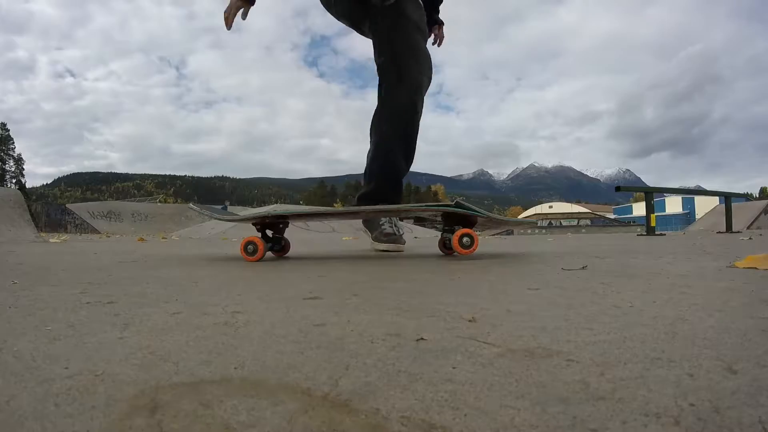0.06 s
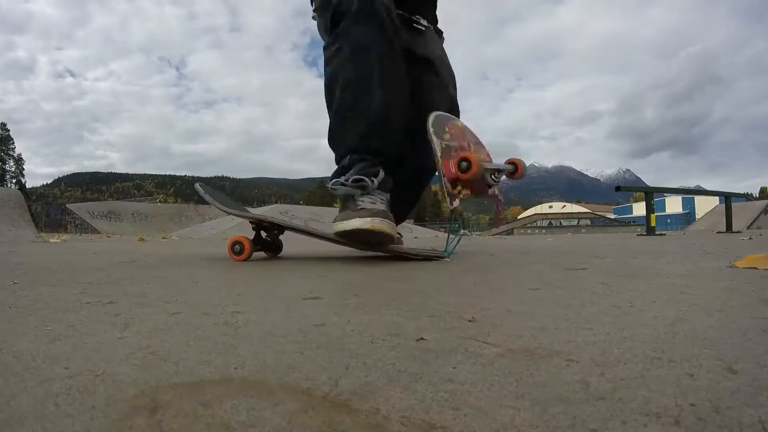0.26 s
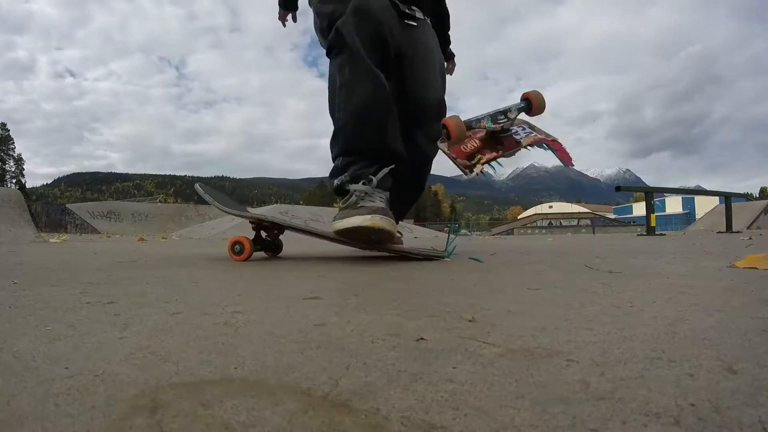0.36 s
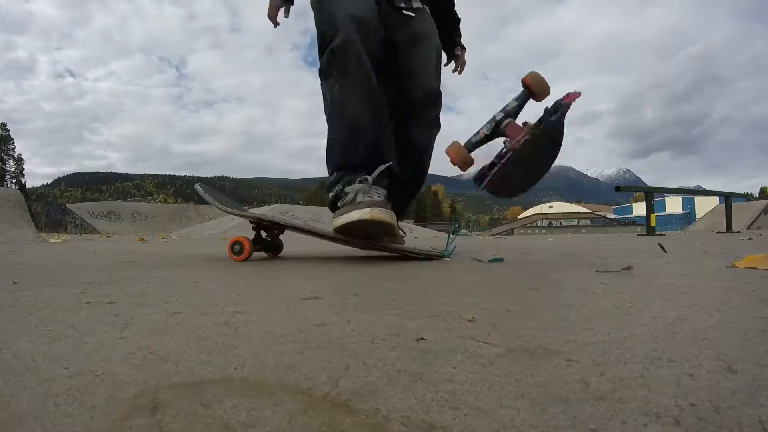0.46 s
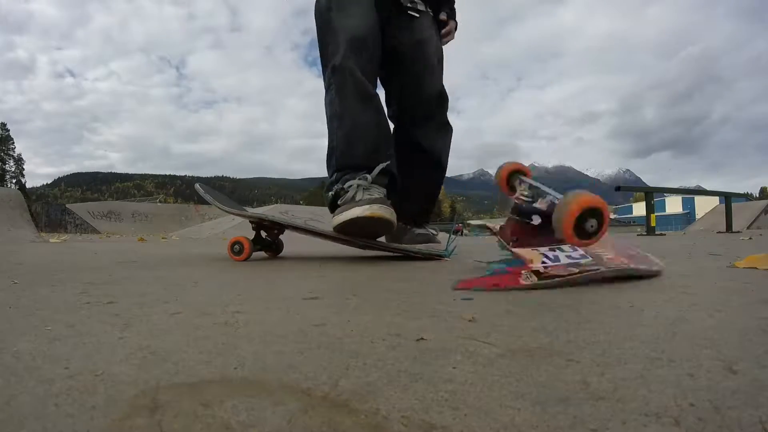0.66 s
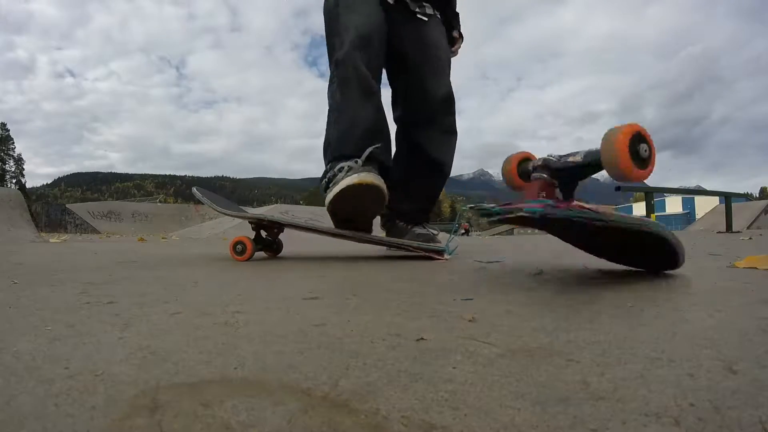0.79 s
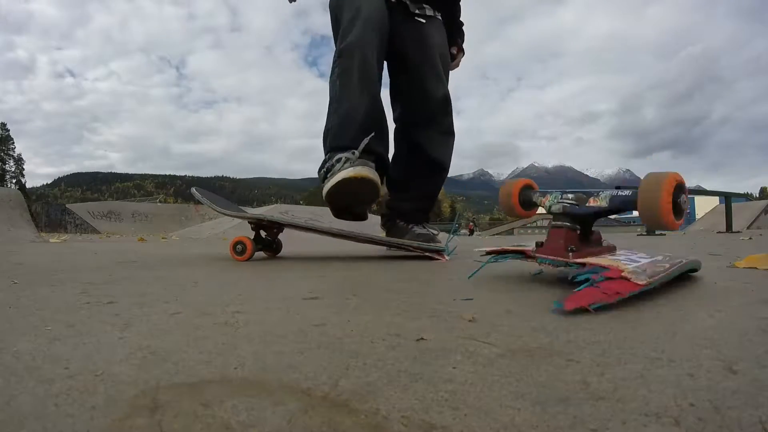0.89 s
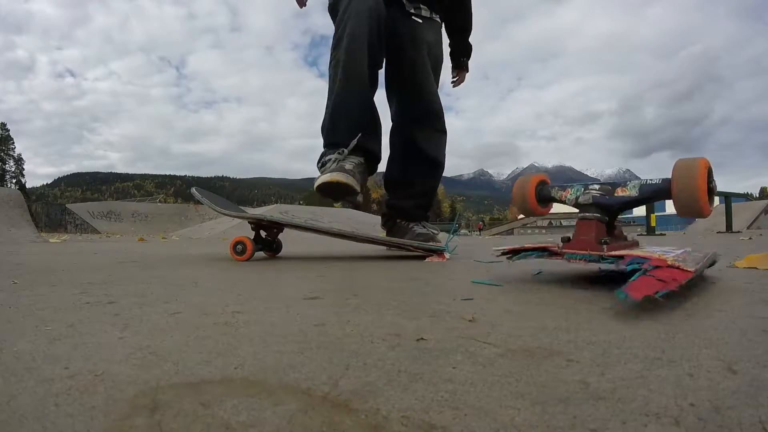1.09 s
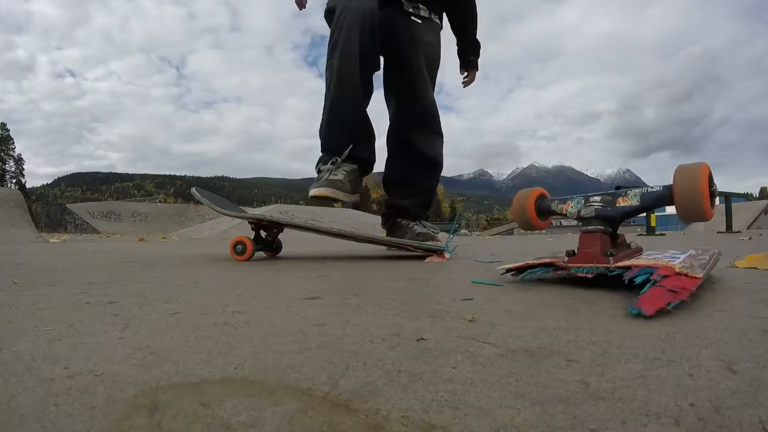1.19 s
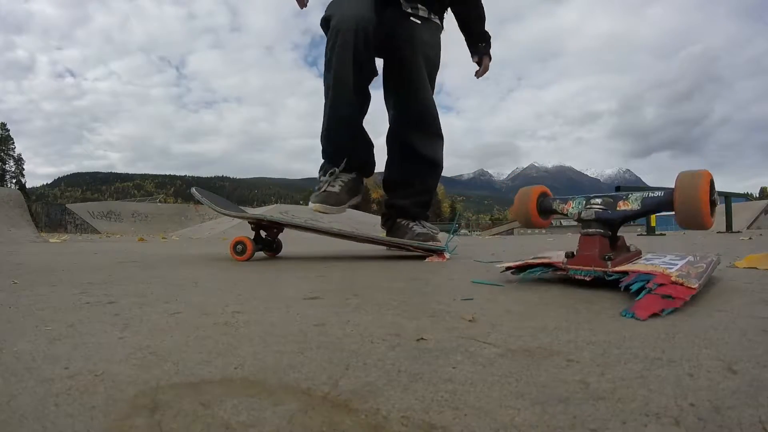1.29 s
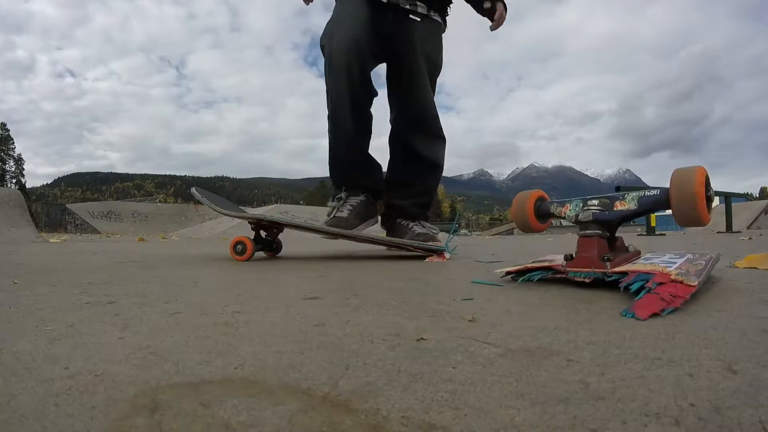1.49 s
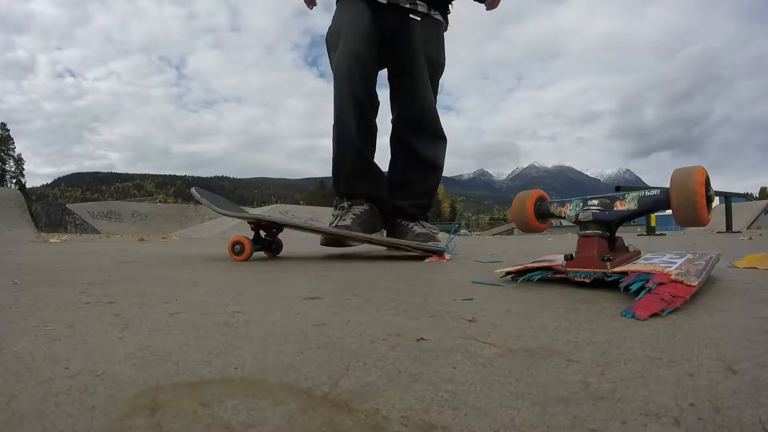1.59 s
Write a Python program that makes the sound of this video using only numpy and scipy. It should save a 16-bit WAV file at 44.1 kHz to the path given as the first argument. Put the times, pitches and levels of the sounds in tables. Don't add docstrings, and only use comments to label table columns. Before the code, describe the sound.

Loud wooden crack of a breaking skateboard, then a flat slam and fading clatter on concrete

```python
import sys
import numpy as np
from scipy import signal
from scipy.io import wavfile
from scipy.ndimage import uniform_filter1d

SR = 44100
rng = np.random.default_rng(int(sys.argv[2]) if len(sys.argv) > 2 else 0)


def persist_wave(psi):
    counts = np.round(np.clip(psi, -1, 1) * 32767).astype(np.int16)
    wavfile.write(sys.argv[1], SR, np.atleast_2d(counts).T)


def ratio(d):
    e = np.asarray(d, float) / 20
    return 10 ** e


N = 72765


def read(points, hz):
    f, value = np.transpose(points)
    return np.interp(np.log(hz + 1), np.log(f + 1), value)


def evened(x):
    return x / np.sqrt(np.mean(x ** 2) + 1e-20)


# frequency in Hz, level in dB per Hz.
STEADY_TOP = [(14500, -90)]


def noise(spectrum, patchy_db, size):
    hz = np.fft.rfftfreq(size, 1 / SR)
    a, b, patches = rng.standard_normal((4 * N // size + 5, len(hz), 3)).T
    patches = uniform_filter1d(patches, size=6, axis=0)
    patches = evened(uniform_filter1d(patches, size=8, axis=1))
    level_db = read(spectrum + STEADY_TOP, hz)[:, None] + patchy_db * patches
    z = (a + 1j * b) * ratio(level_db)
    return evened(signal.istft(z, nperseg=size, noverlap=3 * size // 4)[1][:N])


def struck(hits, modes, hard_blow=True):
    grit_per_s, grit_rise_s, grit_spread_db = 10000, 0.00072, 4
    lead_s = .002
    span = 4096
    t = np.arange(span) / SR
    blows, showers = np.zeros(N + span), np.zeros(N + span)
    rings = [ratio(db - 60 * t / max(t60, .001)) * np.exp(2j * np.pi * hz * t) for hz, db, t60 in modes]
    soft = sum((-1) ** k * ring.imag for k, ring in enumerate(rings))
    spike = sum(rings).real
    late = np.maximum(t - lead_s, 0)
    for s, blow_db, contact_ms, grit_db, t60 in hits:
        at = int(s * SR) - round(0.00192 * SR)
        u = (t - lead_s - (s * SR % 1) / SR) / (max(contact_ms, .03) / 4000)
        push = np.exp(-u ** 2 / 2)
        blows[at:at + span] += ratio(blow_db) * push / push.sum()
        sign, where, size = rng.standard_normal(span), rng.random(span), rng.exponential(1, span)
        grain = ratio(grit_spread_db * np.minimum(size, 3))
        grit = np.sign(sign) * (where < grit_per_s / SR) * grain
        dying = ratio(grit_db - 14.5 - 60 * late / max(t60, .005))
        showers[at:at + span] += dying * np.minimum(late / grit_rise_s, 1) * grit
    rung = signal.fftconvolve(blows, spike if hard_blow else soft)
    return (rung + signal.fftconvolve(showers, soft))[:N]


# frequency in Hz, level in dB per Hz.
TRAFFIC = [(100, -5.5), (360, -6), (850, -4.5), (1200, -20), (2000, -20), (2700, -35.5), (6500, -42),
           (13000, -54.5)]
# frequency in Hz, level in dB per Hz.
WIND = [(12, -50), (20, 6.5), (48, -6), (166, -10.5), (300, -15), (390, -40), (660, -120)]
# frequency in Hz, level in dB per Hz.
HISS = [(900, -17.5), (2000, -5.5), (2800, -16), (5200, -28), (6600, -21), (7600, -36.5), (12500, -68)]
# time in seconds, traffic in dB, wind in dB.
BACKDROP = [
    (0, -41.5, -49),
    (0.186, -41, -36.5),
    (0.223, -52, -66),
    (.58, -51.5, -55.5),
    (0.619, -55.5, -57.5),
    (0.999, -52.5, -53),
    (1.3, -46.5, -49.5),
    (1.65, -40, -46.5),
]


def backdrop():
    wind_trim_db, hiss_db, wind_fade_s = 5.5, -62, .01
    tick_db, tick_s, tick_width_s = -49, .037, 0.00058
    t = np.arange(N) / SR
    s, traffic_db, wind_db = np.transpose(BACKDROP)
    wind = noise(WIND + [(500, -27)], 5.0, size=2048) * np.minimum(t / wind_fade_s, 1)
    wind = wind * ratio(wind_trim_db + np.interp(t, s, wind_db))
    tick = np.exp(-((t - tick_s) / tick_width_s) ** 2) * rng.standard_normal(N + 1)[:N]
    traffic = noise([(40, -31)] + TRAFFIC, 1.2, size=1024) * ratio(np.interp(t, s, traffic_db))
    hiss = noise([(400, -47)] + HISS, 0.45, size=512) * ratio(hiss_db)
    return traffic + wind + hiss + ratio(tick_db) * tick


# start in seconds, blow in dB, contact in ms, splinters in dB, their t60 in s.
CRACKS = [
    (.214, -6.5, 0.15, -20.5, 0.057),
    (.2149, 1, 0.5, -11.5, 0.013),
    (.2168, -6.5, 0.54, -38, 0.0063),
]
# frequency in Hz, level in dB, t60 in seconds.
DECK = [(123, -50.5, 0.055), (214, -7, 0.021), (349, -6.5, 0.031), (601, -1.5, 0.039), (936, -32, 0.0043),
        (1500, -2, 0.017), (1900, 6, 0.0087), (3130, -8.5, 0.012), (4060, -2.5, 0.0064),
        (6340, -9.5, 0.0046)]
# start in seconds, blow in dB, contact in ms,
# splinters in dB, their t60 in seconds.
FLEXES = [
    (.2180, -9.5, 1.25, -32.5, 0.005),
    (.2201, -1.5, 1.55, -30, 0.005),
    (.2214, -3, 0.98, -41, 0.005),
]
# frequency in Hz, level in dB, t60 in seconds.
HALVES = [(226.8, -17, 0.021), (364, 4.5, 0.034), (619, -2, 0.033), (1200, 7, 0.0039)]
# start in seconds, blow in dB, contact in ms, splinters in dB, their t60 in s.
PARTINGS = [
    (.2277, -16, 0.12, -42, 0.011),
    (.2288, -4, 0.33, -30, 0.0076),
]
# frequency in Hz, level in dB, t60 in seconds.
PLY = [(330, 3.5, 0.0051), (570, -9, 0.032), (1330, 4, 0.013), (1910, 10, 0.0092), (3050, 8, 0.0071),
       (5220, -13, 0.005)]


def deck_break():
    return struck(CRACKS, DECK) + struck(FLEXES, HALVES) + struck(PARTINGS, PLY)


# start in seconds, blow in dB, contact in ms, splinters in dB, their t60 in s.
TEARS = [
    (.214, -39, .1, -8.5, 0.049),
    (.2252, -9.5, 0.066, -7, 0.03),
    (.2355, -43, 0.06, -6, 0.013),
    (.2375, -43.5, 0.88, -34, 0.0086),
    (.2425, -45, .1, -9, 0.0038),
    (.2575, -39, 0.24, -35.5, 0.037),
]
# start in seconds, blow in dB, contact in ms,
# grit in dB, its t60 in seconds.
CHIPS = [
    (1.525, -43, 0.25, -46, 0.034),
    (0.765, -56, .06, -62, 0.016),
    (0.81, -46, 0.04, -51, 0.0088),
    (1.42, -44, .06, -40, 0.019),
    (1.568, -43.5, 0.03, -53, .03),
    (1.638, -34, 0.039, -36.5, 0.046),
]
# frequency in Hz, level in dB, t60 in seconds.
FIBRES = [(610, 4, 0.0061), (1334, -4, 0.0059), (1854, -1, 0.0074), (3104, -3.5, 0.0077), (5000, 0, 0.0012),
          (7000, -2.5, 0.0015), (9500, -12.5, 0.00084), (13300, -9.5, .001)]


def splinters():
    return struck(TEARS + CHIPS, FIBRES, hard_blow=False)


# arrival in seconds, level in dB, rise in seconds, t60 in seconds.
RETURNS = [
    (0.249, -40.5, 0.012, 0.13),
    (0.296, -41, 0.04, 0.55),
    (0.439, -48, 0.037, 0.42),
]
# frequency in Hz, level in dB per Hz.
ECHO = [(400, -21), (1070, -14.5), (2000, -1.5), (2660, -17.5), (3430, -10), (5200, -18), (6700, -20.5),
        (13500, -43)]


def banks():
    t = np.arange(N) / SR
    power = np.zeros(N)
    for s, db, rise, t60 in RETURNS:
        fading = ratio(db - 60 * np.maximum(t - s - rise, 0) / t60)
        power += fading ** 2 * np.clip((t - s) / rise, 0, 1) ** 2
    return np.sqrt(power) * noise(ECHO, 0.6, size=256)


# start in seconds, blow in dB, contact in ms,
# grit in dB, its t60 in seconds.
JINGLES = [
    (.257, -42, .05, -43, .02),
    (.268, -44, .05, -55, .015),
    (.279, -46, 0.046, -58, .012),
    (.287, -55, .05, -60, .01),
    (.294, -54, .05, -62, .01),
    (.31, -49, .05, -60, .01),
    (.515, -66, .04, -66, .012),
    (.779, -60, .05, -63, 0.0077),
    (.832, -63, .05, -68, 0.0091),
    (.845, -70, 0.045, -73.5, 0.0091),
]
# frequency in Hz, level in dB, t60 in seconds.
BEARING = [(4230, -3, .008), (5400, 1, 0.011), (6200, 8, 0.006), (9500, -2.5, 0.0067), (12400, -20, .003)]


def loose_bearing():
    return struck(JINGLES, BEARING, hard_blow=False)


# start in seconds, blow in dB, contact in ms, grit in dB, its t60 in s.
TOUCH = [
    (.316, -38, 0.31, -49, 0.023),
]
# frequency in Hz, level in dB, t60 in seconds.
WHEEL = [(977, 3.5, 0.069), (1496, 4.5, 0.056)]


def wheel_touch():
    return struck(TOUCH, WHEEL, hard_blow=False)


# start in seconds, blow in dB, contact in ms, grit in dB, its t60 in seconds.
SLAMS = [
    (.601, -36, 0.94, -45, 0.0081),
    (.6019, 4, 0.4, -17.5, 0.011),
    (.613, -42, 0.25, -57, 0.013),
]
# frequency in Hz, level in dB, t60 in seconds.
FLAT = [(766, 6.5, 0.0092), (1427, -9, 0.016), (1970, 3.5, 0.01), (3260, -31, 0.0037), (3480, -4, 0.011),
        (4530, -31, 0.006), (5280, -8, 0.0072), (6100, -3, 0.0074), (7600, -36, 0.004)]


def flat_slam():
    return struck(SLAMS, FLAT)


# start in seconds, blow in dB, contact in ms, grit in dB, its t60 in s.
SETTLES = [
    (.631, -33, .05, -54, 0.0091),
    (.6342, -23, 0.076, -30.5, 0.043),
    (.646, -32, 0.3, -44, 0.03),
    (.7043, -19.5, 0.79, -51, .03),
    (.718, -34, .06, -39, 0.022),
    (.7222, -23, 0.081, -28, 0.024),
    (.731, -52, 0.68, -35, 0.031),
]
# frequency in Hz, level in dB, t60 in seconds.
TRUCK = [(556, 1, 0.0058), (803, -3, 0.017), (1340, -4, 0.01), (1860, -0.5, 0.014), (2180, 0, 0.0058),
         (3140, -5, 0.0033), (4410, -13, 0.0076), (5550, -18.5, 0.0068), (6650, -17.5, 0.012),
         (8300, -21.5, 0.0043), (12300, -22, .002)]


def truck_rattle():
    return struck(SETTLES, TRUCK, hard_blow=False)


# start in seconds, push in dB, contact in ms,
# grit in dB, its t60 in seconds.
FLAPS = [
    (.64, -35, 1, -47, 0.063),
    (.694, -58, 1, -35, .03),
    (.726, -32.5, 1, -33, 0.034),
    (.9415, -28.5, 0.74, -37, 0.045),
    (1.111, -43.5, 1, -54, .03),
    (1.252, -42, 1, -54, 0.06),
    (1.329, -39.5, 0.66, -64, 0.022),
]
# frequency in Hz, level in dB, t60 in seconds.
TAIL = [(570, 6, 0.056), (760, -11, 0.013)]


def free_tail():
    return struck(FLAPS, TAIL, hard_blow=False)


# start in seconds, blow in dB, contact in ms, grit in dB, its t60 in seconds.
CORNERS = [
    (.6893, -10.5, 0.32, -28.5, 0.018),
]
# frequency in Hz, level in dB, t60 in seconds.
CORNER = [(100, -79, 0.008), (325, -2.5, 0.0057), (620, 1, 0.0094), (1110, -11, 0.019), (1530, -1, 0.0074),
          (2430, 7, 0.0066), (3330, 0.5, 0.014), (4300, -12, 0.0082), (5500, -9.5, 0.0068),
          (6660, -6.5, 0.0025)]


def corner_bounce():
    return struck(CORNERS, CORNER)


# start in seconds, blow in dB, contact in ms, grit in dB, its t60 in seconds.
BOUNCES = [
    (.7765, -23.5, 0.74, -49.5, 0.025),
    (.855, -27, 1, -47, 0.017),
    (.9252, -22.5, 0.033, -19.5, 0.014),
    (.9273, -23.5, .15, -35, 0.039),
    (.945, -21, 0.53, -40, 0.048),
    (1.04, -23.5, 1, -52, 0.013),
]
# frequency in Hz, level in dB, t60 in seconds.
EDGE = [(356, -9.5, 0.0095), (620, -4.5, 0.018), (850, -8, 0.012), (1580, -3.5, 0.014), (2000, -2.5, 0.015),
        (2606, 3, 0.0062), (3540, -10, 0.013), (4260, -13, 0.015), (5940, -17, 0.0097),
        (6800, -12.5, 0.0035), (10040, -31, 0.0025)]


def edge_bounces():
    return struck(BOUNCES, EDGE, hard_blow=False)


# start in seconds, blow in dB, contact in ms, grit in dB, its t60 in seconds.
DROPS = [
    (.936, -10.5, 0.33, -31.5, 0.033),
    (.9373, -29, 0.25, -48, 0.026),
]


def edge_drop():
    return struck(DROPS, EDGE)


# start in seconds, blow in dB, contact in ms, grit in dB, its t60 in s.
SCUFFS = [
    (1.0932, -34.5, 0.09, -40, 0.039),
    (1.098, -32, 0.11, -53, .02),
    (1.2115, -36, 0.051, -39, 0.091),
]
# frequency in Hz, level in dB, t60 in seconds.
TIP = [(1495, -1, 0.021), (2150, 4, 0.0085), (2720, -1.5, 0.013), (3400, -11, 0.012), (4200, -10.5, 0.0051),
       (5960, -14, 0.0043), (8900, -11, 0.0017)]


def tip_scuffs():
    return struck(SCUFFS, TIP, hard_blow=False)


# start in seconds, blow in dB, contact in ms, grit in dB, its t60 in seconds.
ROCKS = [
    (1.1008, -20.5, 0.03, -36.5, 0.055),
    (1.2405, -24, 0.13, -28, 0.016),
    (1.3165, -25, 0.048, -37.5, 0.063),
    (1.404, -26, 0.22, -41.5, 0.06),
    (1.476, -26.5, 0.45, -44.5, 0.045),
    (1.3196, -36, 0.14, -59, 0.023),
]
# frequency in Hz, level in dB, t60 in seconds.
BACK = [(325, -12, 0.034), (627, -6.5, 0.018), (870, -14, 0.075), (1616, 0.5, 0.029), (1980, -10, 0.032),
        (2250, 0.5, 0.008), (3384, -4.5, 0.011), (4340, -9.5, 0.013), (5600, -20, 0.013),
        (6740, -12, 0.0022), (8460, -19, 0.00092), (12500, -34, 0.0024)]


def rocking():
    return struck(ROCKS, BACK, hard_blow=False)


def scene():
    hard = deck_break() + flat_slam() + corner_bounce() + edge_drop()
    light = splinters() + truck_rattle() + edge_bounces() + rocking()
    light = light + wheel_touch() + free_tail() + tip_scuffs() + loose_bearing()
    wood = signal.lfilter(*signal.butter(2, 138, "high", fs=SR), hard + light)
    return np.tile(wood + banks() + backdrop(), (2, 1))


# frequency in Hz, side level in dB.
WIDTH = [(40, -36), (100, -41), (250, -35), (700, -37), (2000, -27), (5000, -19), (10000, -8), (14000, -7)]


def top_cut(x):
    return signal.sosfilt(signal.butter(12, 16480, fs=SR, output="sos"), x)


def record(dry):
    low_cut_hz, top_hz = 43.3, 15900
    limit_db, limit_share, fall_s, fall_db_per_s = -6, 0.34, 0.0021, 370.5
    thin = signal.lfilter(*signal.butter(2, low_cut_hz, "high", fs=SR), dry[0])
    span = max(round(fall_s * SR), 2)
    average = np.ones(span) / span
    power_db = 10 * np.log10(signal.lfilter(average, 1, dry[0] ** 2) + 1e-12)
    fall = np.arange(N) * fall_db_per_s / SR
    peak_db = np.maximum.accumulate(power_db + fall) - fall
    over_db = np.maximum(peak_db - limit_db, 0)
    held = signal.lfilter(average, 1, over_db)
    mid = np.clip(thin / ratio(limit_share * held), -.99, .99)
    low_pass = signal.firwin(95, top_hz, window=("kaiser", 9), fs=SR)
    mid = signal.oaconvolve(mid, low_pass, "same")
    hz, t, z = signal.stft(mid, SR, nperseg=256)
    turn = np.exp(2j * np.pi * rng.random(z.shape))
    side = signal.istft(z * turn * ratio(read(WIDTH, hz))[:, None], SR, nperseg=256)[1][:N]
    return top_cut(np.array([mid + side, mid - side]))


dry = scene()
out = record(dry)
persist_wave(out)
```